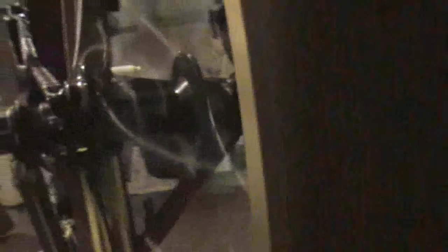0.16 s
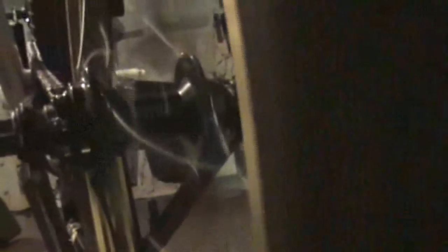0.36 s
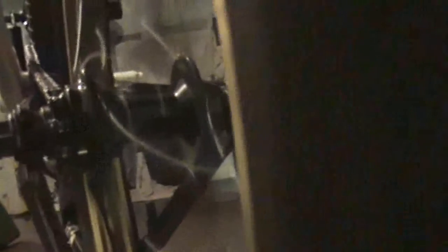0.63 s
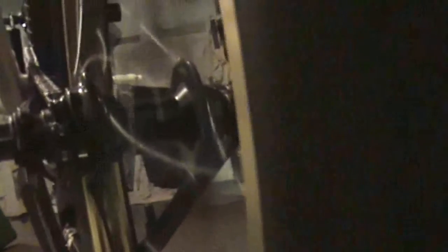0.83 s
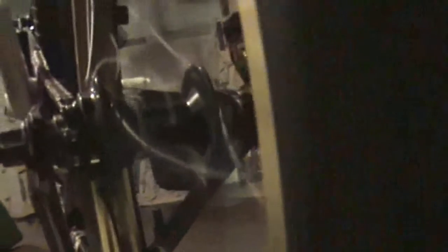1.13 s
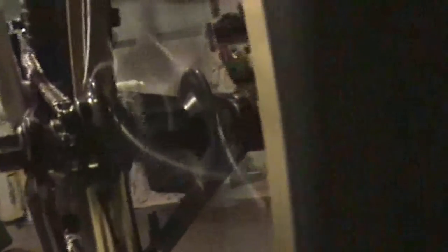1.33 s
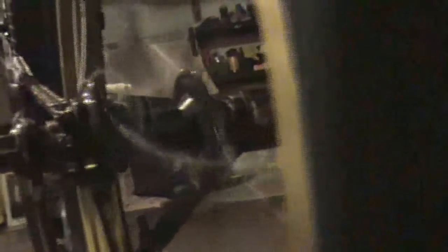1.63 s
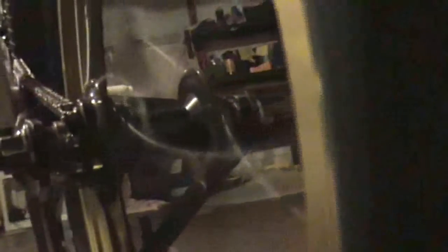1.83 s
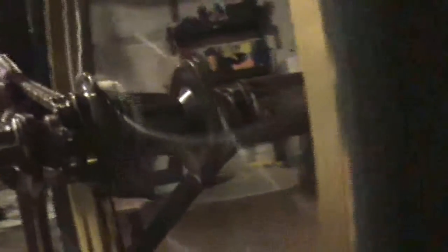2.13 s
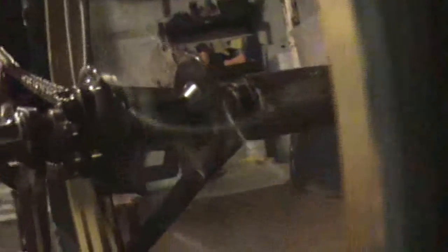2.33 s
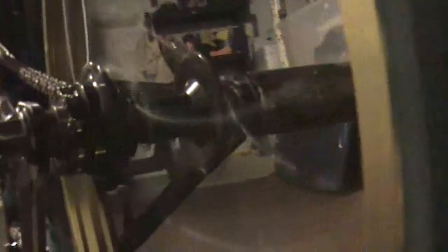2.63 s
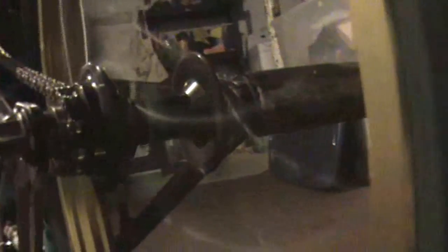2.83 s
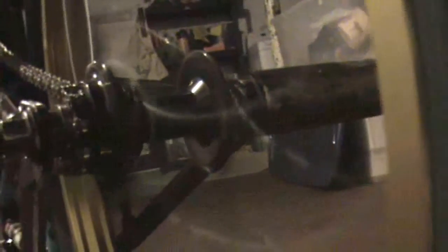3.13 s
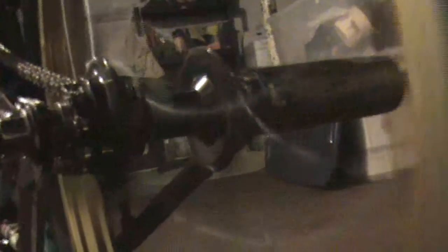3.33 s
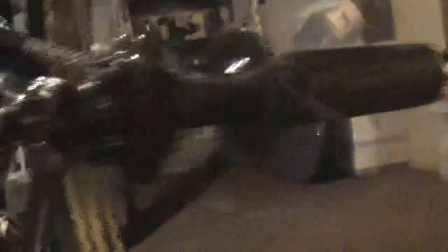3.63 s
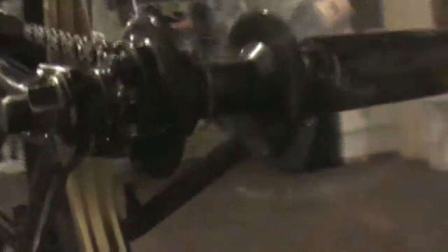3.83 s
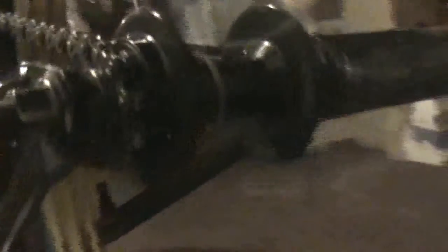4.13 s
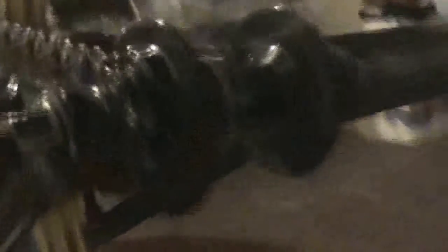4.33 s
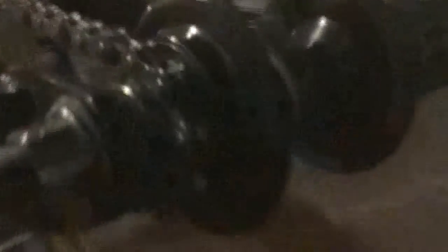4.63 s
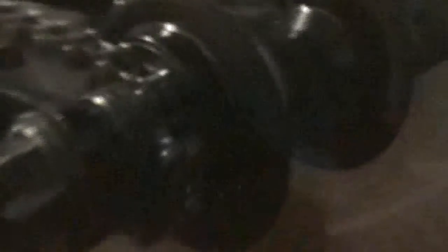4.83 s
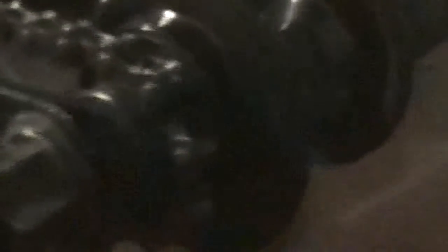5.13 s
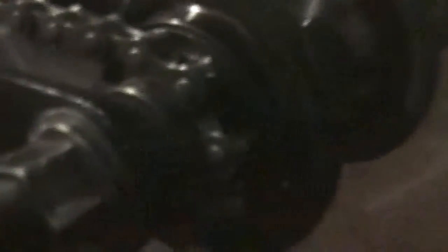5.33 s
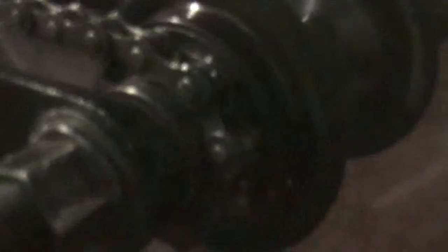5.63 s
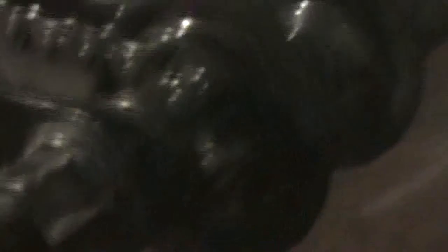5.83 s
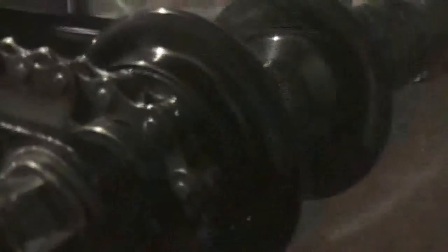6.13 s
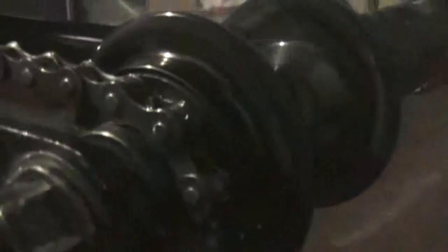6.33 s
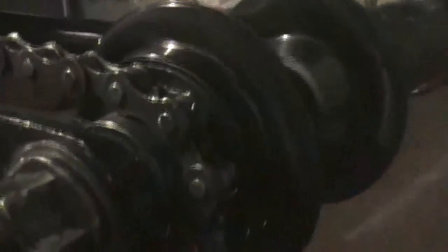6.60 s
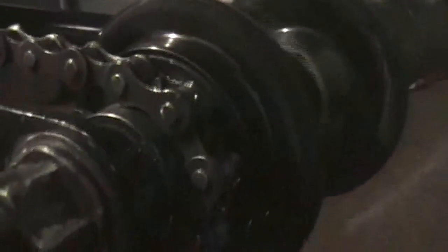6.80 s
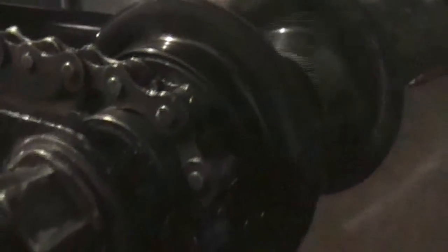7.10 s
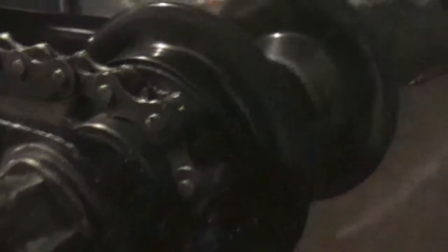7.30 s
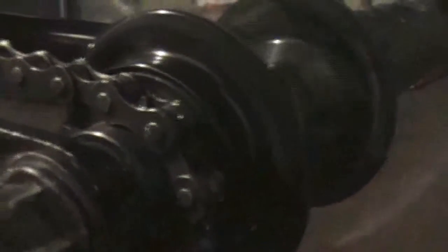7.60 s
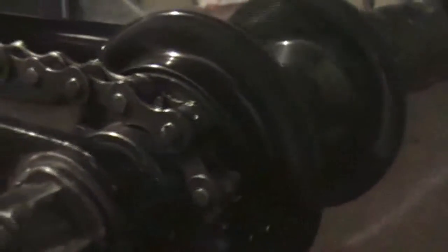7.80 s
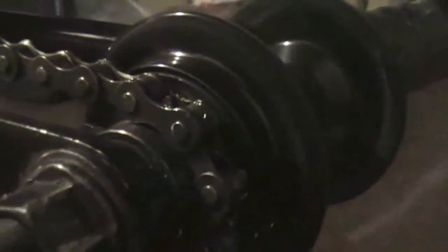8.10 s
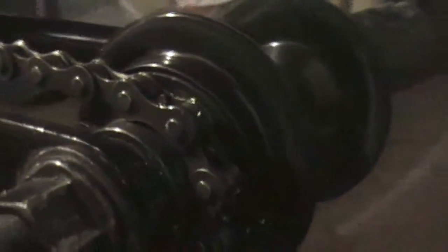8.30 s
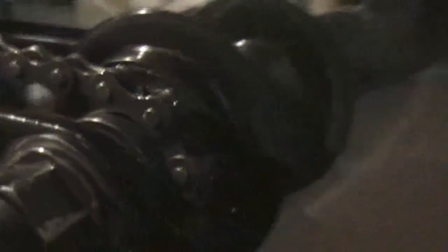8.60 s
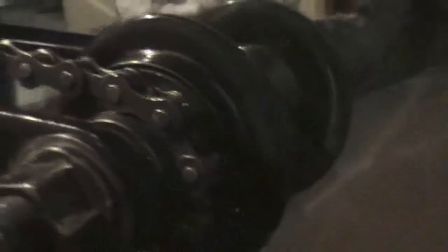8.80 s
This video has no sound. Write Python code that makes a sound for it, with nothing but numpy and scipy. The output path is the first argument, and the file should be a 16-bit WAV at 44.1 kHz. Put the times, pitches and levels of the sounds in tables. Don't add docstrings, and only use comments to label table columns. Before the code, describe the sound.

Rapid freewheel clicks blur into a sharp, insect-like buzz, slowing very slightly, while the microphone moves from behind the tyre to the hub.

```python
import sys
import numpy as np
from scipy import signal
from scipy.fft import rfft, irfft, next_fast_len
from scipy.io import wavfile
from scipy.ndimage import uniform_filter1d

SR = 44100
rng = np.random.default_rng(int(sys.argv[2]) if len(sys.argv) > 2 else 0)


def int16_out(signal):
    q = np.round(np.clip(np.atleast_2d(signal).T, -1, 1) * 32767)
    wavfile.write(sys.argv[1], SR, q.astype(np.int16))


N = 394694

TEETH_AT_START, TEETH_PER_S, SLOWING, EASING = -.12866, 169.86347, 1.313667, .00691411
TOOTH_COUNT = 24
# time_s, level_db
BUZZ_LEVEL = [(0.0, -15.5), (1.57, -15.5), (3.64, -16.5), (4.01, -15.5), (5.03, -17.5), (8.92, -17),
              (8.95, -17)]
# time_s, nearness (0 behind the tyre, 1 past it, 2 along the axle, 3 at the hub)
NEARNESS = [
    (0, 0.81),
    (1.8, 0.78),
    (2.5, 1),
    (3.45, 1.04),
    (3.75, 1.48),
    (4.25, 2.2),
    (4.5, 2.38),
    (5.0, 2.88),
    (8.95, 3.12),
]
# pitch_hz, width_hz, then level_db at nearness 0, 1, 2,
# 3
HUB_MODES = [(1250, 1100, -28, -44, -52, -34.5), (1740, 204, -15, -23, -29, -23.5),
             (2038, 80, -8.5, -5.5, -15.5, -20.5), (2465, 46, -28, -8.5, -19.5, -25.5),
             (2770, 73, 7, -5.5, -10.5, -15.5), (3028, 330, -20, -5.5, -45, -50),
             (3316, 83, -16.5, 3.5, -2, -22.5), (3545, 137, 15.5, -10, -15, -10),
             (3766, 107, -54, -5.5, -17, -13.5), (4083, 367, 0, -4, -2.5, -8.5), (4700, 75, -2.5, -4, -5, -15),
             (5610, 980, -21, -7, -10, -9.5),
             (6510, 410, 6.5, -17, -2, 0.5), (6960, 2250, 0.5, -3, -9, -6), (7665, 770, -32, 5, -1, -4.5),
         (7870, 280, 12.5, 2.5, 1, -15.5), (8777, 1110, 10, 5.5, -20, -0.1), (9060, 940, -34, -1, 0, -1),
         (10520, 137, 11.5, 3.5, -7.5, -10.5), (11320, 450, -14, -12, -28, -15.5),
         (12470, 450, -23, -12.5, -19, -26), (14850, 790, -23, -10, -18, -16),
         (14960, 240, -20, -10, -13, -15.5)]
MODES = HUB_MODES
# beats_per_turn, first_peak_share_of_beat,
# then depth_db of the modes up to 1900, 3400, 4600, 6000 Hz
TURN_BEATS = [(1, .19, 4.5, .4, 0, 0), (2, .87, .8, 2.9, .3, .5), (3, .47, .5, .6, 1.7, 1.8),
              (4, .55, .8, 1.7, .4, 2.1), (5, .58, 0, 1.4, 1.3, 3.6), (6, .4, 1.5, 2.1, .5, .3),
              (7, .7, 0, .7, .6, 1.2), (9, .82, 0, .6, 1.2, .3), (11, .33, 0, .4, 1.3, 0)]
# pitch_hz, level_db
MICROPHONE = [(300, -27), (1000, -7.5), (1700, -4), (2500, 7), (5000, -1), (9000, -4.5), (11500, -3.5),
              (13200, -3.5), (15500, -2.5)]
# pitch_hz, level_db
STEREO_WIDTH = [(500, -19), (1500, -33), (2400, -9), (3600, -12.5), (4500, -11), (6000, -30.5), (7800, -13),
                (10000, -7.5), (12000, -1.5), (14000, -21)]
# pitch_hz, lead_rad
PORT_LEAD = [(0, 0), (520, -0.5), (1720, -0.4), (2500, -1), (4650, 0.49), (9390, 0.07), (10100, -0.12),
             (11800, 0.52), (12700, -1.2), (16200, -3.3)]
# pitch_hz, likeness
PORT_LIKENESS = [(60, 0.99), (150, 1), (380, 0.79), (950, 0.71), (2380, 0.97), (5980, 0.93), (15000, 0.72)]
# pitch_hz, level_db_per_hz
RUMBLE = [(12, -42), (20, -19), (75, 3), (119, -7.5), (163, -0.5), (220, -5.5), (290, -35), (480, -120)]
# pitch_hz, level_db_per_hz
HUM_FAR = [(65, -28), (110, -1.5), (227, -8), (296, 1.5), (366, -4), (499, 2.5), (591, -4), (965, -6.5),
           (1070, -16.5), (1400, -2), (1820, -10.5), (3080, -120)]
# pitch_hz, level_db_per_hz
HUM_NEAR = [(65, -37), (110, -4), (230, -9), (318, 1.5), (452, 4), (685, -8), (758, -15), (831, -21),
            (1000, -11), (1300, -7), (2200, -120)]
# pitch_hz, level_db_per_hz
HISS = [(6000, -30), (10500, -8), (12000, -3), (13300, -9), (14600, -4), (15700, 0)]
# multiple, far_level_db, hub_level_db
PARTIALS = [(5, -70, -72.5), (6, -57, -69.5), (7, -60, -63), (8, -64, -89), (9, -53, -62.5),
            (10, -59, -62.5)]
# start_s, end_s, pitch_hz, level_db
DRONES = [
    (0, 2.4, 85.9, -58.5),
    (1.0, 1.6, 333, -56),
    (1.8, 4, 270.5, -58.5),
]
# start_s, peak_db, pan_db
TICKS = [(3.559, -30, 11), (3.877, -33, -16), (3.923, -29, 8), (4.06, -26, -3), (4.074, -35, 1),
         (4.087, -23.5, -13), (4.099, -27, 9), (4.112, -32, -22), (4.167, -33, 17), (4.365, -38, -23),
         (4.39, -35, -19), (4.782, -38, 3), (4.853, -28, -7), (4.884, -37, -17), (8.295, -31, 11)]
# start_s, peak_db
THUMPS = [(3.499, -28), (3.59, -29), (3.71, -38), (4.297, -40), (4.489, -30), (4.65, -46), (4.699, -35)]
# pitch_hz, side_db
STEREO_FAR = [(4250, 0), (4450, -60), (7100, -60), (7500, 0), (12400, 0), (12700, -60)]
# pitch_hz, side_db
STEREO_NEAR = [(3900, 0), (4200, -60), (5900, -60), (6200, 0), (12800, 0), (13600, -60)]


def gain_of(db):
    return 10 ** (np.asarray(db) / 20)


def evened(x):
    return x / np.sqrt(np.mean(x ** 2) + 1e-20)


def read(points, hz):
    f, value = np.transpose(points)
    return np.interp(np.log(hz + 1), np.log(f + 1), value)


def curve(rows, t):
    times, values = np.transpose(rows)
    return np.interp(t, times, values)


def closeness(t):
    return np.clip(curve(NEARNESS, t) - 2, 0, 1)


def coloured(x, points):
    size = next_fast_len(N)
    gain = gain_of(read(points, np.fft.rfftfreq(size, 1 / SR)))
    return irfft(rfft(x, size) * gain, size)[..., :N]


def echoes(x, start_s, t60, spacing):
    at = np.arange(round(start_s * SR), round((start_s + t60) * SR), int(spacing))
    at = at + rng.integers(0, int(spacing), len(at))
    taps = np.zeros(at[-1] + 1)
    taps[at] = rng.choice([-1., 1.], len(at)) * gain_of(-60 * at / SR / t60)
    return signal.oaconvolve(x, taps / np.linalg.norm(taps))[:N]


def teeth_passed(t):
    passed = TEETH_AT_START + TEETH_PER_S * t - SLOWING * t ** 2 + EASING * t ** 3
    return passed - .01 + .027 * (3 - curve(NEARNESS, t))


def mode_levels(tooth, near):
    mode_hz, _, *levels_db = np.transpose(MODES)
    mode_db = np.array([np.interp(near, range(4), db) for db in np.transpose(levels_db)]).T
    beats, peak, *depth_db = np.transpose(TURN_BEATS)
    swing = np.cos(2 * np.pi * (np.outer(tooth, beats) / TOOTH_COUNT - peak))
    beat_db = np.pad(swing @ np.transpose(depth_db), ((0, 0), (1, 1)))
    group = np.searchsorted([1500, 1900, 3400, 4600, 6000], mode_hz)
    return mode_db + (.65 + .17 * near)[:, None] * beat_db[:, group]


def pawl_blows(count):
    spread_s, fade_db, scatter_db, blow_db, detune = .0005, 4.0, .5, 1.65, .015
    mode_hz = np.transpose(MODES)[0]
    shape = (TOOTH_COUNT, count, len(MODES))
    tooth_hz = mode_hz * (1 + detune * rng.standard_normal(shape[::2]))
    gaps_s = spread_s * rng.uniform(.3, 1.7, shape[:2])
    gaps_s[:, 0] = 0
    after_s = np.cumsum(gaps_s, 1)
    mix = gain_of(scatter_db * rng.standard_normal(shape)) * np.exp(2j * np.pi * rng.random(shape))
    loose = 0.49 * mode_hz / 2000 * rng.standard_normal(shape[::2])
    mix[:, 0] = np.exp(1j * (2 * np.pi * rng.random(len(MODES)) + loose))
    mix[:, 1:, :2] = 0
    mix[:, 1:] *= gain_of(-3.0 * mode_hz / 8000)
    late = after_s / spread_s
    mix = mix * gain_of(blow_db * rng.standard_normal(late.shape) - fade_db * late)[..., None]
    turned = mix * np.exp(-2j * np.pi * tooth_hz[:, None] * after_s[..., None])
    net = abs(turned.sum(1)) ** 2
    mix = mix / np.sqrt(0.57 * net + 0.41 * (abs(mix) ** 2).sum(1))[:, None]
    return tooth_hz, after_s, mix


def frame_paths():
    shape = (2, TOOTH_COUNT, 1024)
    taps = rng.standard_normal(shape) * (rng.random(shape) < .08)
    taps = taps * gain_of(-60 * np.arange(1024) / SR / .012)
    taps = taps * (np.arange(1024) > [[[24]], [[2]]])
    return rfft(taps / np.linalg.norm(taps, axis=2, keepdims=True))


def ratchet(count=4, rise_hz=1500):
    t = np.arange(N) / SR
    passed = teeth_passed(t)
    click = np.arange(0, int(passed[-1]) + 1)
    s, tooth = np.interp(click, passed, t), click % TOOTH_COUNT
    near, width_hz = curve(NEARNESS, s), np.transpose(MODES)[1]
    mode_db = mode_levels(tooth, near)
    tooth_hz, after_s, mix = pawl_blows(count)
    wander = .14 * rng.standard_normal((len(click), count, len(MODES), 2)) @ [.5, 1j]
    blows = mix[tooth] * np.exp(wander) * gain_of(mode_db)[:, None]
    delay_s = after_s[tooth] + .000006 * rng.standard_normal(blows.shape[:2])
    delay_s = delay_s + (s * SR % 1 / SR)[:, None] + 32 / SR
    hz, out = np.fft.rfftfreq(1024, 1 / SR), np.zeros((2, N + 1056))
    paths = frame_paths()
    echo = gain_of(7.0 - 4.6 * near)[:, None]
    for k in range(TOOTH_COUNT):
        mine = tooth == k
        off = 1j * (hz - tooth_hz[k][:, None])
        rings = 1 / (1 + 2 * off / width_hz[:, None]) / (1 + off / rise_hz) ** 2
        delays = np.exp(-2j * np.pi * hz * delay_s[mine][..., None])
        spectra = (blows[mine] @ rings * delays).sum(1)
        spectra = spectra * (1 + echo[mine] * paths[0, k])
        due = gain_of(2 * mode_db[mine]) @ abs(rings) ** 2
        got = (abs(spectra) ** 2).mean(0) * due / due.mean(0)
        spectra = spectra * (uniform_filter1d(due, size=13) / uniform_filter1d(got, size=13)) ** .46
        at = (s[mine] * SR).astype(int)[:, None] + np.arange(1024)
        np.add.at(out[0], at, irfft(spectra))
        np.add.at(out[1], at, irfft(spectra * paths[1, k]))
    return evened(coloured(out[:, 32:][:, :N], MICROPHONE))


def hub_in_room():
    t = np.arange(N) / SR
    direct, scattered = ratchet()
    near = curve(NEARNESS, t)
    mid = direct + gain_of(-8.5 - 2.6 * near) * echoes(direct, .005, .28, 22)
    diffuse = scattered + gain_of(-50 - 1.7 * near) * echoes(direct, .004, .2, 22)
    size = next_fast_len(N)
    lead = np.tan(np.clip(read(PORT_LEAD, np.fft.rfftfreq(size, 1 / SR)), -2, 2) / 2)
    side = coloured(diffuse, STEREO_WIDTH) + irfft(1j * lead * rfft(mid, size), size)[:N]
    level = gain_of(curve(BUZZ_LEVEL, t)) / np.sqrt(uniform_filter1d(mid ** 2, SR // 2))
    return level * np.array([mid + side, mid - side])


def air(far, near, level_db, patchy_db, lead):
    frames, hz = N // 512 + 5, np.fft.rfftfreq(2048, 1 / SR)
    a, b, c, d, patches = rng.standard_normal((frames, len(hz), 5)).T
    patches = evened(uniform_filter1d(uniform_filter1d(patches, 8, 0), 6, 1))
    same = np.clip(read(PORT_LIKENESS, hz), -1, 1)[:, None]
    left = a + 1j * b
    shared = same * left * np.exp(-1j * lead * read(PORT_LEAD, hz))[:, None]
    right = shared + np.sqrt(1 - same ** 2) * (c + 1j * d)
    share = closeness(np.arange(frames) * 512 / SR)
    colour_db = np.outer(read(far, hz), 1 - share) + np.outer(read(near, hz), share)
    z = np.array([left, right]) * gain_of(colour_db + patchy_db * patches)
    noise = signal.istft(z, nperseg=2048, noverlap=1536)[1][:, :N]
    return gain_of(level_db) * evened(noise)


def shelter():
    start = 2.3
    return np.clip((curve(NEARNESS, np.arange(N) / SR) - start) / (3 - start), 0, 1)


def tyre_wind():
    fade_db = 2.5 * np.minimum(np.arange(N) / SR, 5.0)
    return air(RUMBLE, RUMBLE, -52.5 - fade_db - 8 * shelter(), patchy_db=3.5, lead=0.1)


def room_hum():
    return air(HUM_FAR, HUM_NEAR, -46.5 - 8.5 * shelter(), patchy_db=2.0, lead=0.63)


def hiss():
    return air(HISS, HISS, -39.5, patchy_db=5.0, lead=.9)


def purr():
    t = np.arange(N) / SR
    passed, near, out = teeth_passed(t), curve(NEARNESS, t) / 3, np.zeros(N)
    for multiple, far_db, near_db in PARTIALS:
        swell = sum(np.sin(2 * np.pi * (hz * t + rng.random())) for hz in (.23, .6, 1.4))
        level_db = far_db + (near_db - far_db) * near + 1.7 * swell
        out += gain_of(level_db) * np.sin(2 * np.pi * multiple * passed)
    return out


def drones():
    out = np.zeros(N)
    for start, end, hz, db in DRONES:
        size = round((end - start) * SR)
        waver = 1 + 0.0103 * evened(uniform_filter1d(rng.standard_normal(size), 3000))
        tone = np.sin(2 * np.pi * np.cumsum(hz * waver) / SR) * signal.windows.tukey(size, .4)
        out[round(start * SR):][:size] += gain_of(db) * tone
    return out


def handling():
    out, t = np.zeros((2, N)), np.arange(3000) / SR
    case = np.zeros(len(t))
    for hz, db, t60 in [(563, -6, 0.046), (1010, 7.0, 0.0062), (1305, 3.5, 0.0067), (1760, -4, 0.0074)]:
        case += gain_of(db - 60 * t / t60) * np.sin(2 * np.pi * hz * t)
    for s, db, pan_db in TICKS:
        pan = np.array([[.5], [-.5]]) * pan_db
        out[:, round(s * SR):][:, :len(t)] += gain_of(db - 10.0 + pan) * case
    push = np.sin(2 * np.pi * 60 * t) * np.exp(-t / 0.012)
    for s, db in THUMPS:
        out[:, round(s * SR):][:, :len(t)] += gain_of(db - 11) * push
    return out


def scene():
    return hub_in_room() + tyre_wind() + room_hum() + hiss() + purr() + drones() + handling()


def low_pass(x):
    return signal.sosfilt(signal.butter(12, 16610, fs=SR, output="sos"), x)


def record(dry):
    ceiling = 1.17
    edge = signal.firwin(1023, 15830, window=("kaiser", 11), fs=SR)
    left, right = signal.oaconvolve(ceiling * np.tanh(dry / ceiling), edge[None], "same")
    share = closeness(np.arange(N) / SR)
    wide = left - right
    side = (1 - share) * coloured(wide, STEREO_FAR) + share * coloured(wide, STEREO_NEAR)
    full = np.repeat(rng.random(N // 1024 + 1) < .16, 1024)[:N] * share
    full = uniform_filter1d(full, size=256)
    side = side + full * (wide - side)
    mix = np.array([left + right + side, left + right - side]) / 2
    return low_pass(mix)


dry = scene()
out = record(dry)
int16_out(out)
```